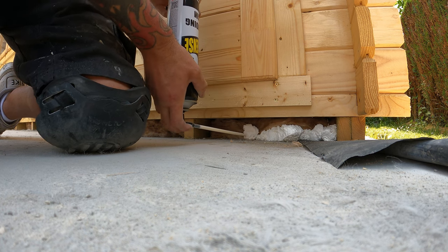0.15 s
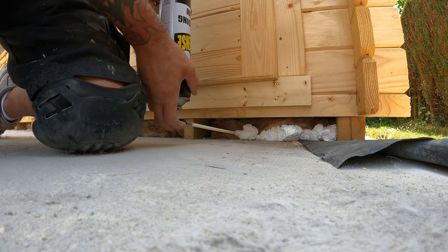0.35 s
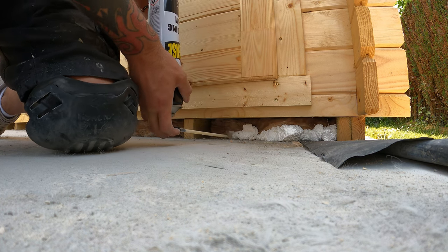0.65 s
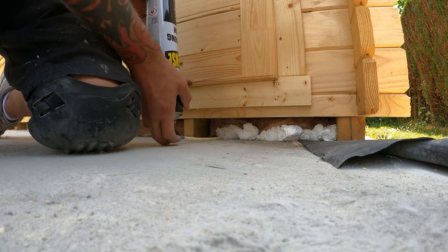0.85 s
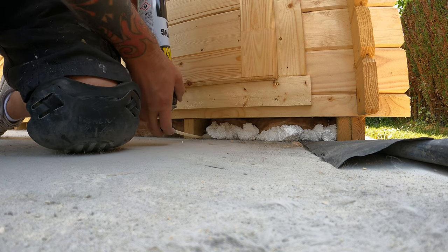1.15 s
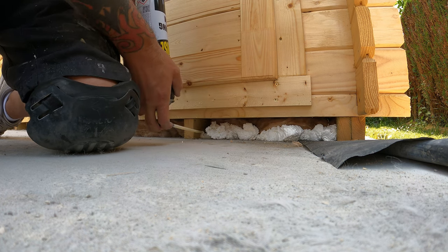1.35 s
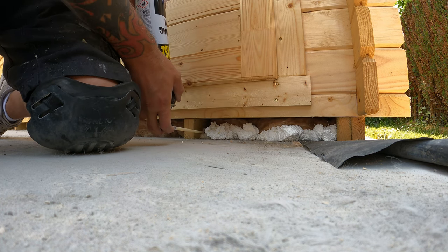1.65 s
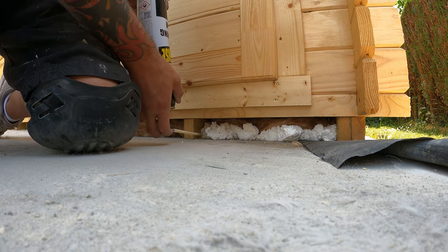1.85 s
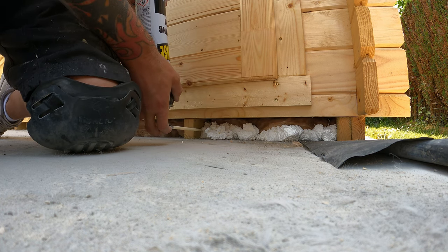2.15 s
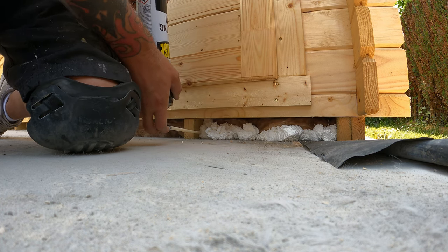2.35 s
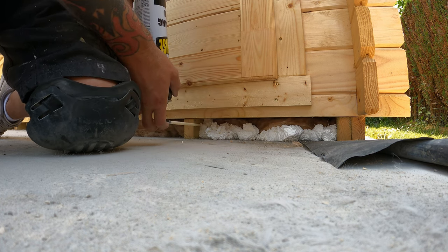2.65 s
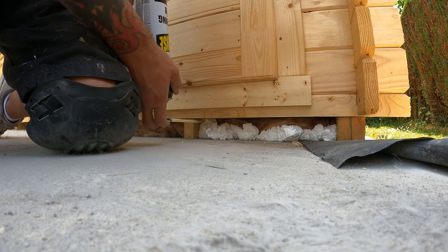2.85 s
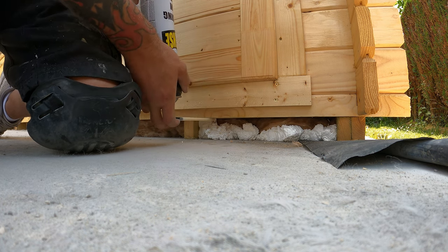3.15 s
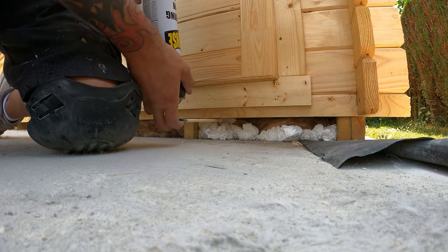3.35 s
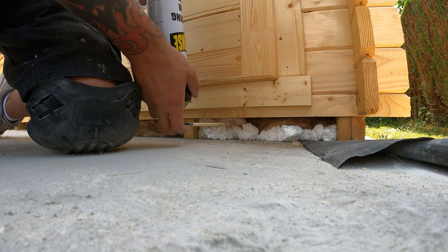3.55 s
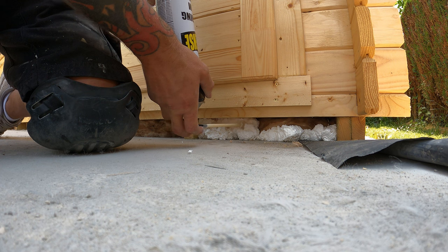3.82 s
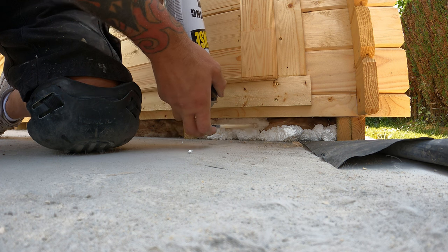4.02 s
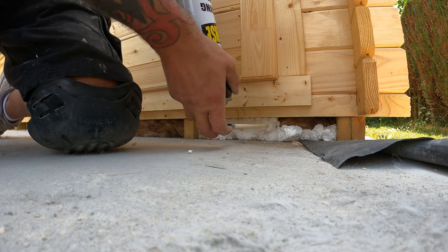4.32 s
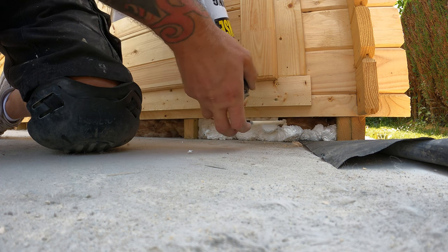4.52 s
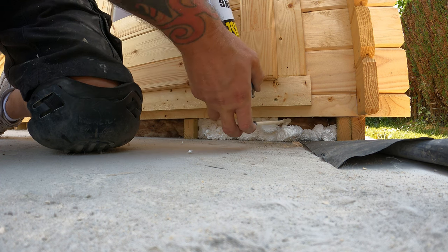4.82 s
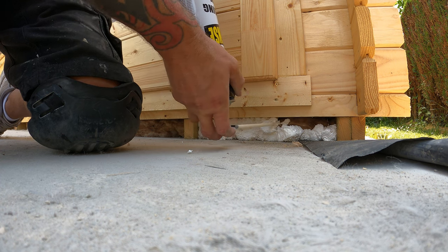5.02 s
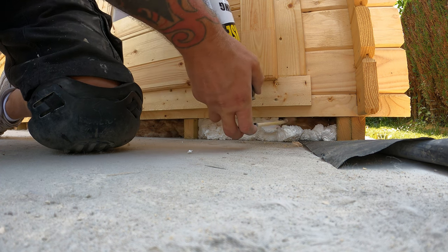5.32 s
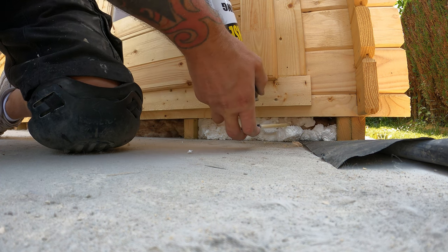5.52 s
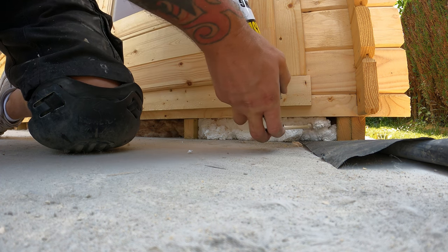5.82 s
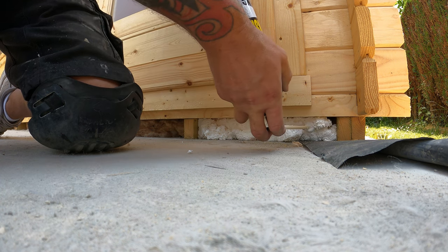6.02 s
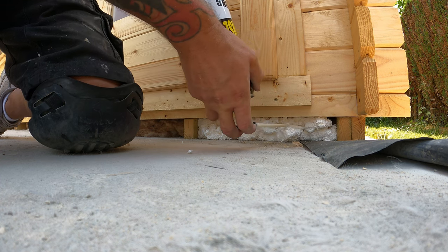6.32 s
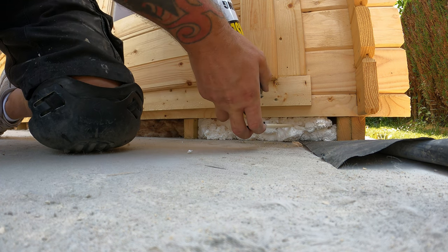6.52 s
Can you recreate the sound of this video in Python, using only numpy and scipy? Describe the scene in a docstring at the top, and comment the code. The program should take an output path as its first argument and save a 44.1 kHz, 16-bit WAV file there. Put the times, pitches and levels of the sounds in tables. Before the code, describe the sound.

A can of expanding foam is sprayed close by, into the gap between a wooden shed and a concrete slab. For the first half second foam oozes softly with a thin, breathy whistle and a few dull plops; the plastic trigger creaks faintly at about 0.6 seconds. A wet, spluttering hiss runs from 0.8 to 1.2 seconds, followed by three briefer spurts at about 1.8, 2.3 and 2.9, all slightly hollow. A longer spray from 3.4 to 4.4 seconds moves over fresh foam and takes on a shifting, ringing colour. Small bubbles spit quietly from 5.1 to 5.4, then a last, more open spray hisses until 6 seconds. Each burst leaves a faint outdoor tail. Quiet, low garden air continues throughout, and a very faint distant whine swells around 2.3 seconds and again near the end.

```python
"""Expanding foam is sprayed from a can into the gap under a wooden shed, close by on a concrete slab.
Over low garden air, foam first oozes out with a thin whistle and a few plops, then the trigger creaks.
Four short squeezes splutter and hiss, coloured by the slab and the hollow, as a far-off whine swells.
A long fifth squeeze moves out over fresh foam, where the jet blows a ringing pocket. Bubbles spit,
and a last squeeze hisses in the open. The garden gives the can a faint tail throughout."""
import sys
import numpy as np
from scipy import signal
from scipy.fft import rfft, irfft
from scipy.io import wavfile
from scipy.ndimage import uniform_filter1d

SR = 44100
rng = np.random.default_rng(int(sys.argv[2]) if len(sys.argv) > 2 else 0)


def to_wav(sig):
    """Store sig (one row per channel, or 1-D mono) as 16-bit WAV at the path in sys.argv[1].

    Samples outside -1..1 are clipped; the rate is SR.
    """
    pcm = np.clip(np.atleast_2d(sig), -1, 1) * 32767
    pcm = np.round(pcm).astype(np.int16)
    wavfile.write(sys.argv[1], SR, pcm.T)  # frames by channels


N = 294147
FRAME, HOP = 1024, 256
TIME, HZ = np.arange(N) / SR, np.fft.rfftfreq(FRAME, 1 / SR)

# The straw's path: time_s, place (0 weeping, 1 deep in the gap, 2 at its edge, 3 over foam), slab_echo_ms
STRAW_PATH = [(0.5, 0.55, 0.31), (0.72, 0.57, 0.2), (0.9, 0.82, 0.36), (1.15, 0.95, 0.33),
              (1.85, 0.63, 0.27), (2.38, 0.55, 0.25), (3.0, 0.8, 0.34), (3.45, 1.6, 0.33),
              (3.65, 2.22, 0.31), (3.8, 2.34, 0.32), (4.0, 2.45, 0.31), (4.1, 3.4, 0.36),
              (5.42, 2.87, 0.34), (6.0, 2.63, 0.4)]
# Light touches that only let foam ooze: start_s, end_s, rise_db_per_s, splutter_db, hiss_db, fizz_db
OOZES = [(0, 0.49, 2000, -25.5, -40.5, -50.5), (0.29, 0.348, 1000, -51.5, -37, -48.5),
         (0.415, 0.504, 407, -36, -37.5, -49), (0.721, 0.773, 1994, -39, -47, -58),
         (2.876, 2.899, 2500, -34, -45.5, -49), (3.31, 3.337, 352, -45.5, -68.5, -61.5),
         (3.385, 3.4, 1198, -35.5, -61, -56), (5.112, 5.259, 172, -46.5, -59.5, -62.5),
         (5.385, 5.408, 121.5, -43, -56, -59)]
# Full squeezes: crack_s, open_s, release_s, splutter_db, hiss_db, fizz_db, held_back_db, garden_send_db
SQUEEZES = [(0.769, 0.795, 1.203, -22.5, -14, -20, -10, 1),
            (1.751, 1.786, 1.896, -22.5, -14, -23, -15.5, 1),
            (2.299, 2.326, 2.401, -20, -14.5, -20.5, -12.5, 3),
            (2.915, 2.942, 3.0157, -18.5, -15.5, -18, -12.5, 9),
            (3.404, 3.433, 4.410, -21, -19.5, -20, -9.5, 1.5),
            (5.408, 5.432, 5.99, -22, -19, -19, -13, -0.5)]
# Attack until the valve cracks: splutter_db_per_s, hiss_db_per_s, fizz_db_per_s
ATTACK = [2397.5, 2004, 1800]
# Drift over one squeeze as the straw fills with foam: splutter_db, hiss_db, fizz_db
THICKENING = [3.5, 1.1, -5.0]
# Release, the gas stopping before the foam: splutter_db_per_s, hiss_db_per_s, fizz_db_per_s
RELEASE = [403, 798.5, 843.5]
# Splutter EQ with the valve barely open, in the gap, at its edge, in the open: frequency_hz, gain_db
SPLUTTER_THICK = [(40, -50), (130, -14), (220, -7.5), (380, 3), (720, -4.5), (1020, -7), (1400, -23.5)]
SPLUTTER_HOLLOW = [(40, -44), (130, -21), (220, -14.5), (380, -5.5), (560, -11), (760, -4), (1080, -2.5),
                   (1400, -12)]
SPLUTTER_EDGE = [(40, -44.5), (130, -21), (220, -13), (380, -5.5), (720, -9), (1020, -0.5), (1400, -9.5)]
SPLUTTER_OPEN = [(40, -52.5), (130, -21.5), (220, -15.5), (380, -4), (720, 1), (1020, -0.5), (1400, -13.5)]
# Gas EQ at the straw's four places: frequency_hz, gain_db
GAS_WEEPING = [(1350, -7), (1650, 5.5), (2200, -15.5), (2750, -15), (3350, -3), (3800, -18), (4500, -26),
               (5400, -26.5), (7000, -23), (8000, -24.5), (10300, -12), (12000, -29.5), (15500, -22.5)]
GAS_IN_GAP = [(1350, -9.5), (1950, -11), (2350, -16.5), (2750, -7), (3350, 0), (3700, -7.5), (4200, -3.5),
              (4900, -10.5), (5600, -12), (7700, -6.5), (8800, -21.5), (10800, -16), (15500, -35)]
GAS_AT_EDGE = [(1350, -11.5), (1650, -6), (2150, -27.5), (2700, -13), (3150, -4), (3500, -13.5), (4050, -2),
               (4550, -9.5), (5250, -3.5), (6300, -12), (9300, -10), (10600, -17.5), (15500, -28.5)]
GAS_OVER_FOAM = [(1350, -11.5), (1600, -2.5), (2050, -0.5), (2400, -0.5), (2950, 4.5), (3600, 3),
                 (3950, -0.5), (4600, -5.5), (5400, -3.5), (6800, -3.5), (8500, -3), (11500, -9),
                 (15500, -17.5)]
# Ring of the pocket blown into the foam, as its size changes: time_s, lower_pitch_hz, upper_pitch_hz
POCKET_PITCHES = [(3.472, 2970, 5950), (3.55, 3150, 5170), (3.61, 4080, 5060), (3.72, 4050, 5090),
                  (4.0, 3120, 5220), (4.1, 3080, 5300), (4.19, 3840, 5800), (4.38, 3480, 5800),
                  (5.45, 3060, 5480), (5.58, 2980, 5700), (5.73, 2800, 5600), (5.85, 2850, 5070),
                  (5.999, 2880, 4660)]
# The pocket's lower and upper resonance: half_width_hz, boost_db
POCKET_PEAKS = [(160, 5.5), (300, 5)]
# Thin whistles of the barely open valve: start_s, end_s, pitch_hz, half_width_hz, level_db
WHISTLES = [(0, 0.284, 7120, 300, -50), (4.995, 5.416, 8550, 300, -68)]
# EQ of the outdoor air: frequency_hz, gain_db
AIR_EQ = [(15, -13), (30, -2), (90, -1.5), (160, -5), (260, -15), (500, -15), (900, -21.5), (1500, -26),
          (3000, -28), (7000, -33), (15500, -38)]
# Decay of the garden's tail: frequency_hz, t60_s
GARDEN_DECAY = [(150, 1), (1000, 0.54), (3000, 0.85), (6000, 0.43), (14000, 0.94)]
# Return level of the garden's tail: frequency_hz, gain_db
GARDEN_RETURN = [(150, -34.5), (600, -36), (1800, -28), (3200, -36.5), (6000, -34.5), (14000, -49.5)]
# Single bubbles bursting at the tip: time_s, relative_level_db, relative_snap_db
SPITS = [(0.116, -10, -18), (0.222, -14, -28), (0.241, -37, -25), (0.282, -15, -16), (3.336, -25, -29),
         (5.127, -24, -14.5), (5.176, -27.5, -19.5), (5.215, -22, -20), (5.259, -25, -25),
         (5.323, -28.5, -30), (5.364, -31, -11), (5.437, -9.5, -19.5)]
# EQ of a lone bubble: frequency_hz, gain_db
PLOP_EQ = [(40, -28.5), (130, -11.5), (220, 5.5), (420, 7), (720, 0.5), (1020, -13.5), (1400, -47.5)]
# The trigger creaking back: peak_s, relative_level_db
CREAKS = [(0.5416, -37), (0.6054, -26.5), (0.6134, -38), (0.6199, -34.5), (0.6397, -38)]
# EQ of the trigger's plastic: frequency_hz, gain_db
PLASTIC_EQ = [(120, -35.5), (200, -3), (376, -1), (602, -11), (980, -2.5), (1750, -10), (2090, -1),
              (2550, -12), (3470, -0.5), (15000, -28.5)]
# Swells of the far-off whine: peak_s, level_db, rise_db_per_s, fall_db_per_s
WHINE_SWELLS = [(1.65, -69, 89, 12), (2.27, -58.5, 66, 32), (2.59, -57, 61, 240.5), (6.62, -64, 38.5, 10)]


def gain_of(db):
    return 10 ** (np.asarray(db) / 20)


def unit_rms(x):
    return x / np.sqrt(np.mean(x ** 2) + 1e-20)


def curve_at(points, hz):
    """A curve joined by straight lines on a log-frequency axis."""
    f, value = np.transpose(points)
    return np.interp(np.log(hz + 1), np.log(f + 1), value)


def follow(rows, t):
    """The columns of an automation curve at the times t."""
    times, *columns = np.transpose(rows)
    return [np.interp(t, np.maximum.accumulate(times), c) for c in columns]


def add(mix, start_s, sound):
    part = mix[max(round(start_s * SR), 0):][:len(sound)]
    part += sound[:len(part)]


def equalised(x, eq):
    return irfft(rfft(x) * gain_of(curve_at(eq, np.fft.rfftfreq(len(x), 1 / SR))), len(x))


def below(edge_hz, order=16):
    """Share of the power under a crossover."""
    return 1 / (1 + (HZ / edge_hz) ** order)


def ramp(start_s, length_s):
    return np.clip((TIME - start_s) / max(length_s, 1 / SR), 0, 1)


def flutter(rate_hz):
    """Random wobble up to about this rate, rms 1."""
    f = np.fft.rfftfreq(N, 1 / SR)
    return unit_rms(irfft(rfft(rng.standard_normal(N)) * f / (f + 8) / (1 + (f / rate_hz) ** 2), N))


def fuzzy_tone(pitch_hz, half_width_hz):
    """Noise in one narrow resonance, rms 1."""
    f = np.fft.rfftfreq(N, 1 / SR)
    return unit_rms(irfft(rfft(rng.standard_normal(N)) / (1 + ((f - pitch_hz) / half_width_hz) ** 2), N))


def gate_db(start_s, end_s, rise_db_per_s):
    """Splutter, hiss and fizz swell up to the start, hold, and fall once the trigger is let go."""
    attack_db = -np.outer(rise_db_per_s, np.maximum(start_s - TIME, 0))
    return attack_db - np.outer(RELEASE, np.maximum(TIME - end_s, 0))


def valve(snap_s=0.008, creep_db_per_s=221.5, kick_db=0.5, kick_s=0.016, foam_share=0.22):
    """Envelopes of splutter, hiss and fizz: a squeeze cracks the valve, then opens it; a touch oozes."""
    power = np.zeros((3, N))
    for crack_s, open_s, release_s, *levels_db, held_back_db, _ in SQUEEZES:
        opened = ramp(open_s, snap_s)
        cracked_db = held_back_db + creep_db_per_s * np.minimum(TIME - open_s, 0)
        overshoot_db = kick_db * np.exp(-np.maximum(TIME - open_s, 0) / kick_s)  # pent-up gas
        gas_db = (1 - opened) * cracked_db + opened * overshoot_db
        db = np.c_[levels_db] + np.outer([foam_share, 1, 1], gas_db)  # foam only partly follows the gas
        db += np.outer(THICKENING, ramp(open_s, release_s - open_s) - .5)
        power += gain_of(db + gate_db(crack_s, release_s, ATTACK)) ** 2
    for start_s, end_s, rise, *levels_db in OOZES:
        power += gain_of(np.c_[levels_db] + gate_db(start_s, end_s, rise)) ** 2
    return np.sqrt(power)


def bubbling(per_s, spread_db, share):
    """Bubbles of uneven size burst in turbulent gas; share is their part of the power."""
    sizes = gain_of(spread_db * np.minimum(rng.exponential(1, N), 3.5))
    clicks = sizes * rng.choice([-1., 1.], N) * (rng.random(N) < per_s / SR)
    return np.sqrt(share) * unit_rms(clicks) + np.sqrt(1 - share) * rng.standard_normal(N)


def slab_and_hollow(t, slab_gain=0.33, slab_hz=9000, hollow_ms=1.944, hollow_hz=5000):
    """Comb filters: one bounce off the concrete, and echoes to and fro under the shed."""
    place, slab_ms = follow(STRAW_PATH, t)
    feedback = np.interp(place, [1, 2], [0.35, 0.069])[:, None]  # weaker as the straw leaves the gap
    phase_per_ms = -2j * np.pi * HZ / 1000
    bounce = slab_gain * below(slab_hz, order=2) * np.exp(phase_per_ms * slab_ms[:, None])
    round_trip = feedback * below(hollow_hz, order=2) * np.exp(phase_per_ms * hollow_ms)
    return (1 + bounce) / (1 - round_trip)


def through_gap(drive, eqs, place, band, scatter_db=5.0):
    """Morphs between EQs as the straw moves and adds the rings and echoes around it, at even power."""
    _, t, spectra = signal.stft(drive, SR, nperseg=FRAME, noverlap=FRAME - HOP)
    place = np.clip(np.interp(t, TIME, place), 0, len(eqs) - 1)[:, None]
    db = sum(np.maximum(1 - abs(place - k), 0) * curve_at(eq, HZ) for k, eq in enumerate(eqs))
    in_open = np.clip(place - 1, 0, 1)
    for pitch_hz, (half_width_hz, boost_db) in zip(follow(POCKET_PITCHES, t), POCKET_PEAKS):
        db += in_open * boost_db / (1 + ((HZ - pitch_hz[:, None]) / half_width_hz) ** 2)
    # hand, can and lumps of foam scatter the shorter waves in shifting patches
    patches = uniform_filter1d(rng.standard_normal(db.shape), size=14, axis=0)
    patches = unit_rms(uniform_filter1d(patches, size=5, axis=1))
    db += scatter_db * patches * (1 - below(1200, order=2)) * below(13000, order=4)
    colour = gain_of(db) * slab_and_hollow(t) * np.sqrt(band)
    colour /= np.sqrt(np.mean(abs(colour) ** 2, axis=1, keepdims=True))
    return signal.istft(spectra * colour.T, SR, nperseg=FRAME, noverlap=FRAME - HOP)[1][:N]


def spray(thin_hiss_db=-33):
    """Plugs of foam splutter out of the straw and chop the jet of gas behind them."""
    splutter_gain, hiss_gain, fizz_gain = valve()
    foam_eqs = [SPLUTTER_THICK, SPLUTTER_HOLLOW, SPLUTTER_EDGE, SPLUTTER_OPEN]
    gas_eqs = [GAS_WEEPING, GAS_IN_GAP, GAS_AT_EDGE, GAS_OVER_FOAM]
    place = follow(STRAW_PATH, TIME)[0]
    thinned = np.minimum(hiss_gain / gain_of(thin_hiss_db), 1) ** 2  # without gas the foam comes thick
    foam_place = np.maximum(place, np.minimum(2 * place, 1))  # hollow as soon as the straw enters
    low, low_and_mid = below(1600), below(4800)
    plugs = flutter(rate_hz=34)
    wet = bubbling(per_s=1100, spread_db=3.0, share=0.51)
    jet = bubbling(per_s=2500, spread_db=1.5, share=0.26)
    splutter = through_gap(wet, foam_eqs, foam_place * thinned, low) * unit_rms(gain_of(0.86 * plugs))
    hiss = through_gap(jet, gas_eqs, place, (1 - low) * low_and_mid) * unit_rms(gain_of(0.96 * plugs))
    fizz = through_gap(jet, gas_eqs, place, 1 - low_and_mid) * unit_rms(gain_of(0.8 * plugs))
    return splutter_gain * splutter + hiss_gain * hiss + fizz_gain * fizz


def valve_whistles():
    """Gas squeezes past the valve seat in a thin, breathy tone."""
    out = np.zeros(N)
    for start_s, end_s, pitch_hz, half_width_hz, level_db in WHISTLES:
        gate = uniform_filter1d(((TIME >= start_s) & (TIME < end_s)).astype(float), size=7000)
        out += gain_of(level_db) * gate * fuzzy_tone(pitch_hz, half_width_hz)
    return out


def outdoor_air(level_db=-58.5):
    """A low, gently wavering bed of air."""
    rumble = equalised(rng.standard_normal(N), AIR_EQ)
    return gain_of(level_db) * unit_rms(rumble * gain_of(1.2 * flutter(rate_hz=9)))


def garden_tail(x, build_s=0.013):
    """A diffuse tail from shed, hedge and house: each band dies away at its own rate."""
    hz, t, spectra = signal.stft(x, SR, nperseg=256)
    power = uniform_filter1d(abs(spectra) ** 2, size=7, axis=0)
    decay = gain_of(-60 * t / curve_at(GARDEN_DECAY, hz)[:, None]) ** 2 * (1 - np.exp(-t / build_s))
    lingering = signal.fftconvolve(power, decay / decay.sum(1, keepdims=True), axes=1)[:, :len(t)]
    noise = signal.stft(rng.standard_normal(N), SR, nperseg=256)[2]
    tail = noise / noise.std() * np.sqrt(abs(lingering)) * gain_of(curve_at(GARDEN_RETURN, hz))[:, None]
    return signal.istft(tail, SR, nperseg=256)[1][:N]


def pop(spectrum):
    """A sharp-fronted, minimum-phase pulse with this spectrum, peak 1."""
    log_gain = np.log(np.maximum(spectrum / spectrum.max(), 1e-4))
    mirrored = np.concatenate([log_gain, log_gain[-2:0:-1]])
    pulse = np.fft.ifft(np.exp(np.conj(signal.hilbert(mirrored)))).real
    return pulse / abs(pulse).max()


def bubble_spits(trim_db=-3, snap_trim_db=3):
    """Bubbles burst at the tip, each a dull plop with a small snap of gas."""
    out = np.zeros(N)
    plop = pop(gain_of(curve_at(PLOP_EQ, HZ)) * np.sqrt(below(1350)))
    snap = pop(gain_of(curve_at(GAS_WEEPING, HZ)) * np.sqrt(1 - below(1800, order=6)))
    for time_s, level_db, snap_db in SPITS:
        add(out, time_s, gain_of(level_db + trim_db) * (plop + gain_of(snap_db + snap_trim_db) * snap))
    return out


def trigger_creaks(trim_db=-10, t60_s=0.085, rise_s=0.0063):
    """Short scrapes of plastic swell and stop as the trigger is let go."""
    out, t = np.zeros(N), np.arange(-SR // 40, SR // 10) / SR
    envelope = np.where(t < 0, np.exp(np.minimum(t, 0) / rise_s), gain_of(-60 * t / t60_s))
    for peak_s, level_db in CREAKS:
        scrape = unit_rms(equalised(rng.standard_normal(len(t)), PLASTIC_EQ))
        add(out, peak_s + t[0], gain_of(level_db + trim_db) * envelope * scrape)
    return out


def far_whine():
    """A faint, far-off whine swells and fades on one pitch."""
    swells = [gain_of(level_db - np.maximum(rise * (peak_s - TIME), fall * (TIME - peak_s)))
              for peak_s, level_db, rise, fall in WHINE_SWELLS]
    return np.max(swells, axis=0) * fuzzy_tone(pitch_hz=1230, half_width_hz=150)


def scene():
    """The can up close, with a garden send for each squeeze, over the ambience; both channels alike."""
    can = spray() + bubble_spits() + trigger_creaks() + valve_whistles()
    sends = [(s, send_db) for crack_s, _, release_s, *_, send_db in SQUEEZES for s in (crack_s, release_s)]
    send = gain_of(follow(sends, TIME)[0])
    return np.tile(can + garden_tail(can * send) + outdoor_air() + far_whine(), (2, 1))


def record(dry):
    """Clips at full scale, then cuts the treble above 15.8 kHz."""
    lowpass = signal.firwin(511, 15800, window=("kaiser", 9), fs=SR)
    return signal.oaconvolve(np.clip(dry, -1, 1), lowpass[None], "same")


dry = scene()
out = record(dry)
to_wav(out)
```